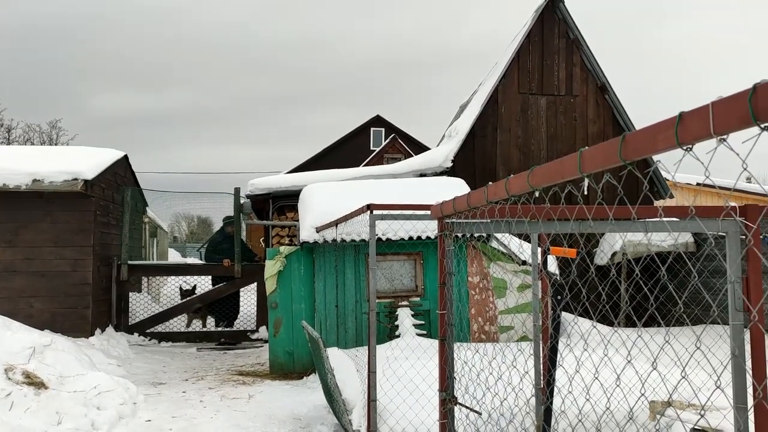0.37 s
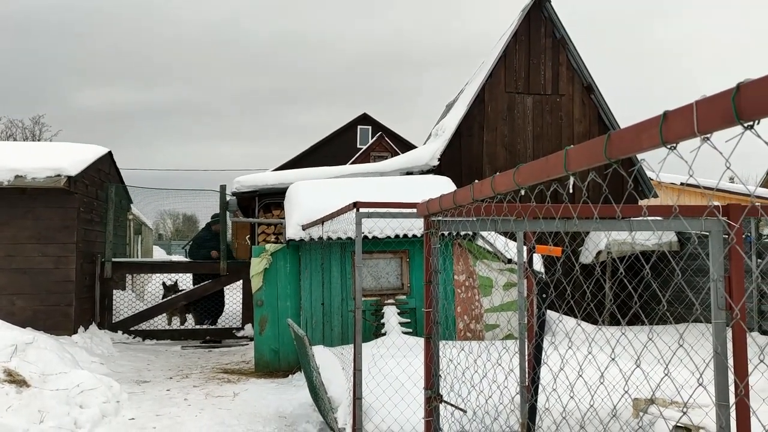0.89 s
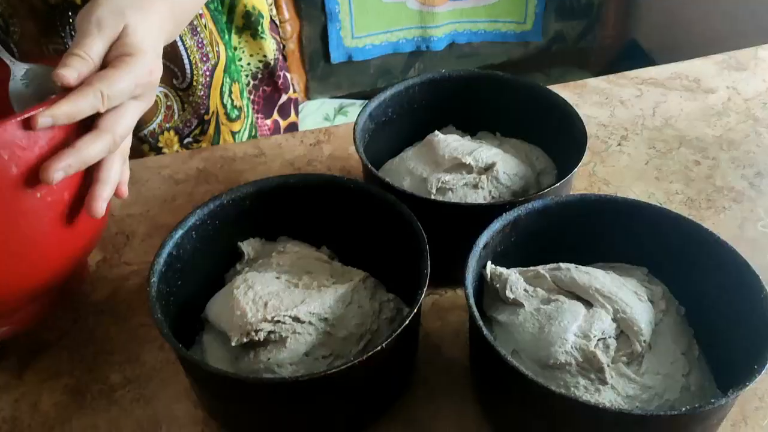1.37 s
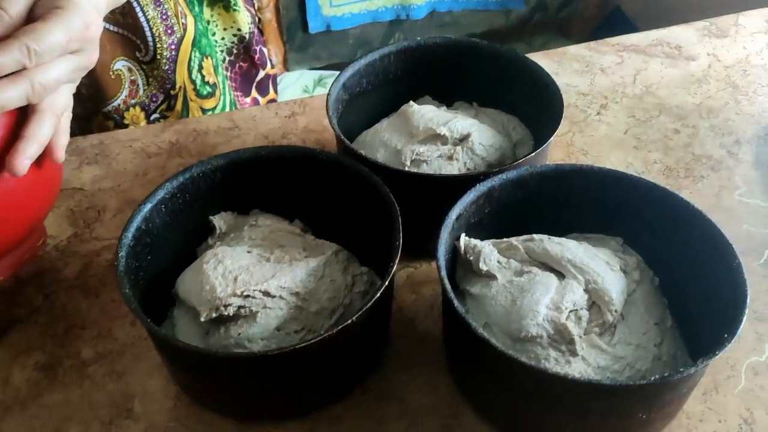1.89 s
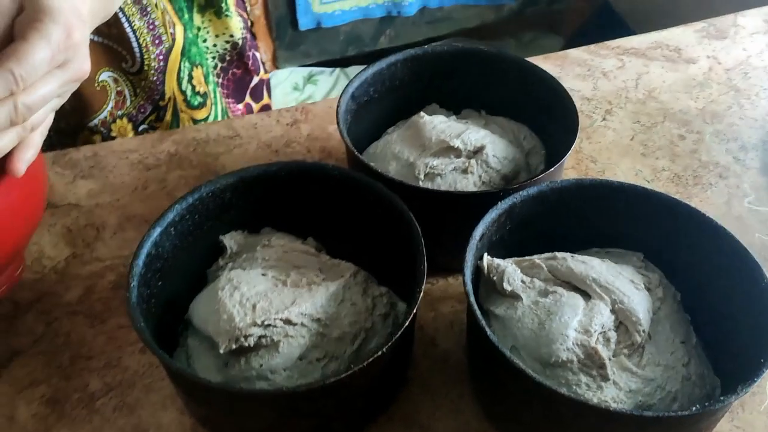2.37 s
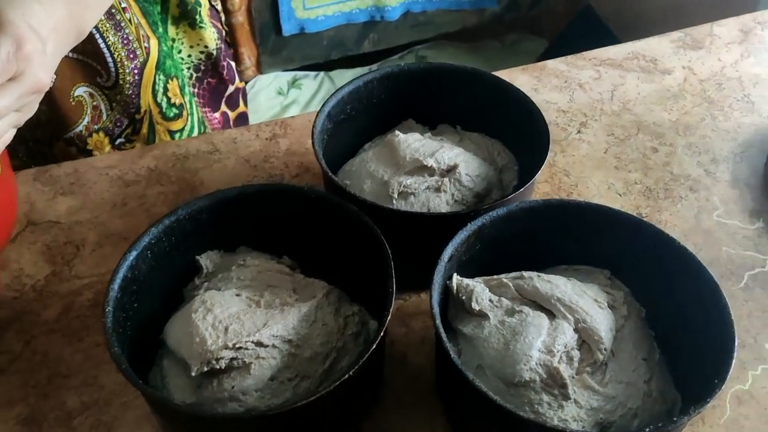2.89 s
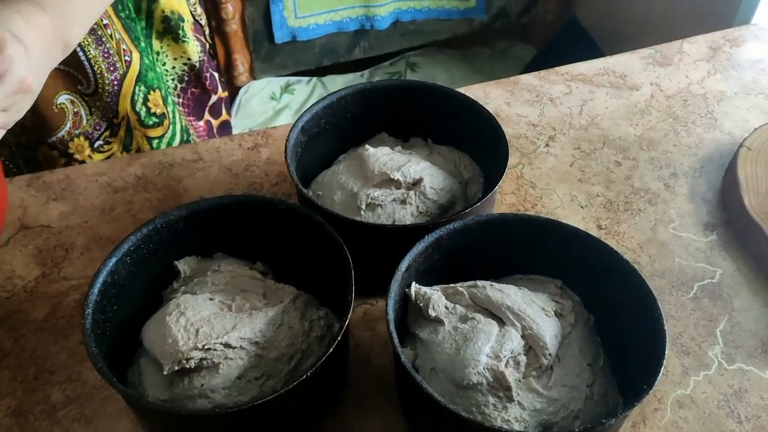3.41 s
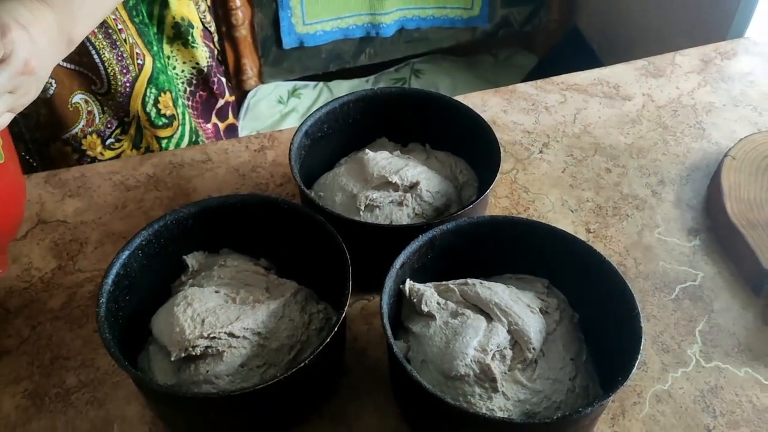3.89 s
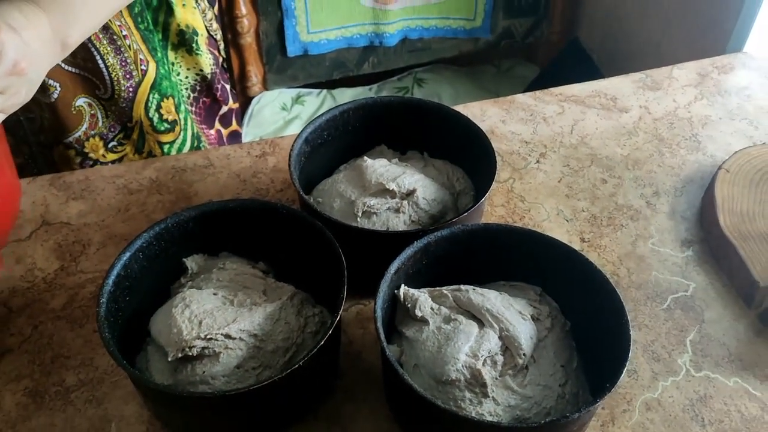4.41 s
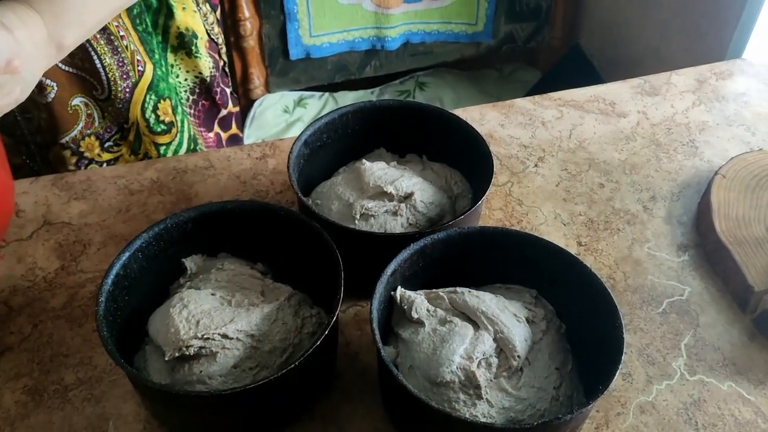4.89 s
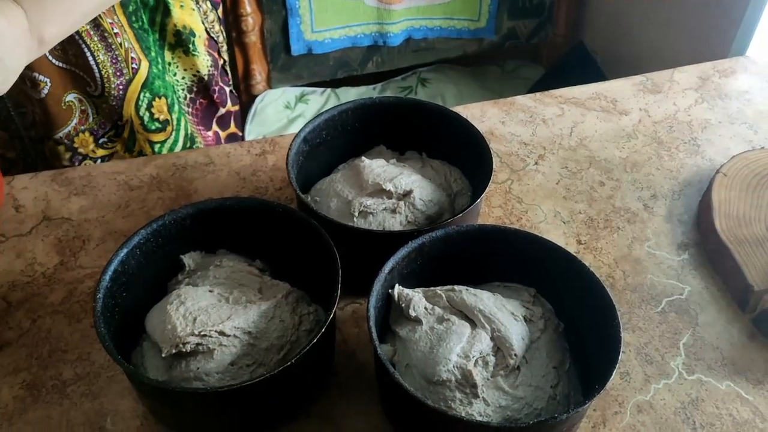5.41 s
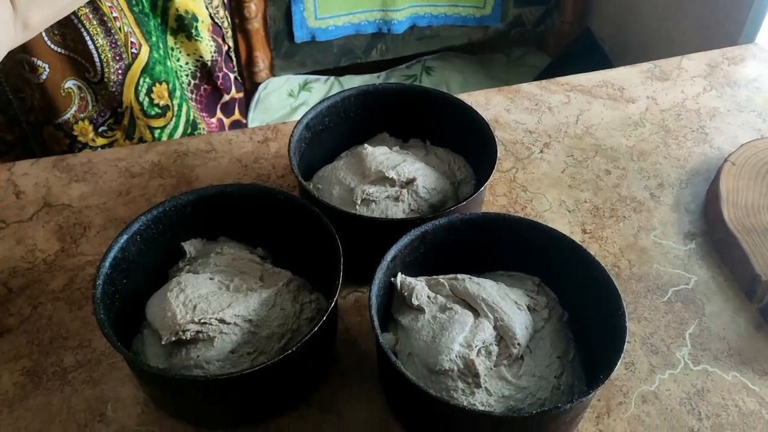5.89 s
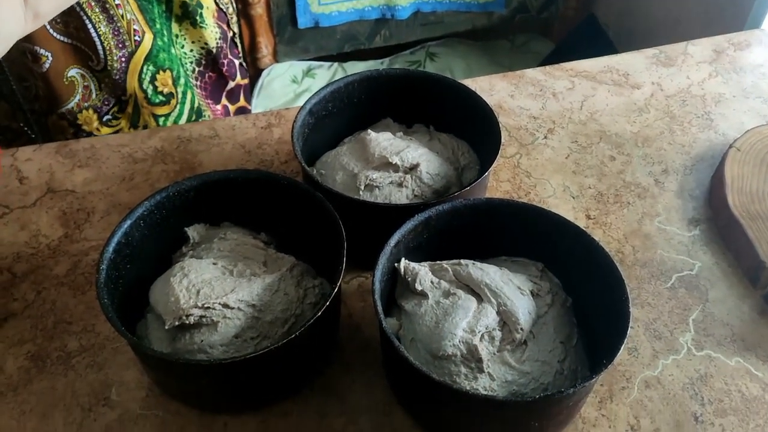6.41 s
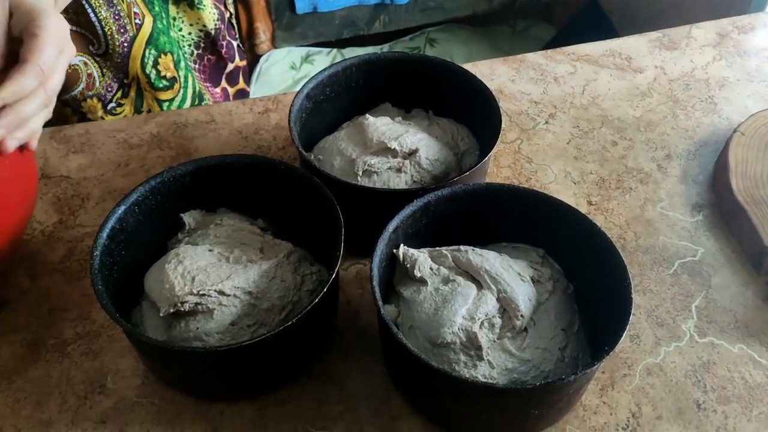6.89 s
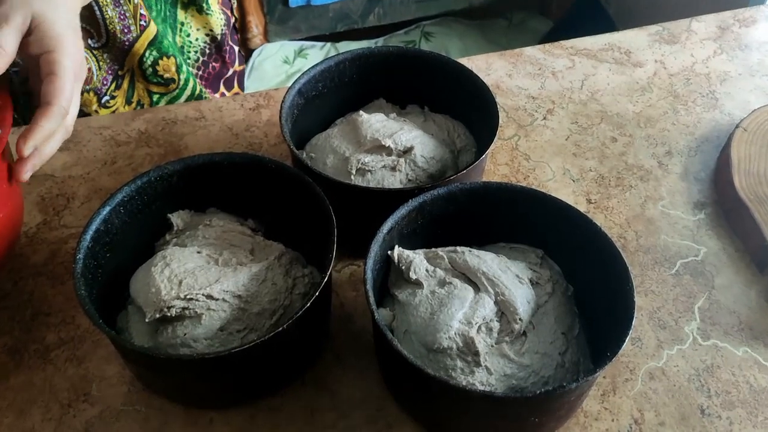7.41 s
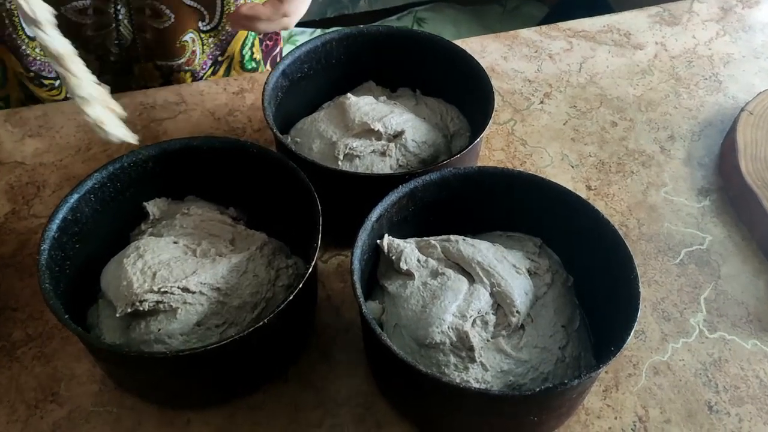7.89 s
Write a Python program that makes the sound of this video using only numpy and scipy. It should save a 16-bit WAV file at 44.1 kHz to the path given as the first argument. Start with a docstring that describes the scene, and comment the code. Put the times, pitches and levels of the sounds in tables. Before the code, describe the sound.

Boots crunch briefly in snow under light wind, then in a kitchen a spoon knocks and scrapes sticky dough from a plastic bowl.

```python
"""A spoon knocks into a plastic bowl on a kitchen table, to the right, and scrapes sticky dough off its wall.
Blows are struck sums of fading sines; scraping sends rough grains through the same bowl, plus rasp and hiss.
The table thumps along, and a small room answers with scattered echoes over quiet air.
Before the kitchen comes about a second of snowy yard, then a short silent cut: shaped noise makes the wind,
and grains of noise make the crunching snow."""
import sys
import numpy as np
from scipy import signal
from scipy.fft import rfft, irfft, next_fast_len
from scipy.io import wavfile
from scipy.ndimage import uniform_filter1d, map_coordinates

SR = 44100
rng = np.random.default_rng(int(sys.argv[2]) if len(sys.argv) > 2 else 0)


def to_wav(sig):
    """Store sig (one row per channel, or 1-D mono) as 16-bit WAV at the path in sys.argv[1].

    Samples outside -1..1 are clipped; the rate is SR.
    """
    pcm = np.clip(np.atleast_2d(sig), -1, 1) * 32767
    pcm = np.round(pcm).astype(np.int16)
    wavfile.write(sys.argv[1], SR, pcm.T)  # frames by channels


def linear_from_db(decibels):
    """Turn decibels (scalar or array-like) into linear amplitude factors; 0 gives 1."""
    return 10 ** (np.asarray(decibels, float) / 20)


N = 354123  # length in samples

# Spoon blows. Each row: start in seconds, level in dB, tone of the struck spot in Hz,
# hardness in dB (more means more treble), table thump in dB (more means more thump).
KNOCKS = [(1.408, -51.5, 350, 0, -34), (1.677, -35.5, 624, 1.5, -64), (1.727, -52.5, 348, 14.5, -39),
          (1.761, -39.5, 322, 0, -49), (2.059, -56, 370, -13, -12), (2.143, -31.5, 420, -8, -42),
          (2.223, -45, 579, 2, -26), (2.631, -39.5, 420, -0.5, -24), (3.091, -51.5, 390, -8.5, -14),
          (3.18, -38.5, 355, -26, -18), (3.519, -38.5, 400, -4, 1), (3.602, -21, 420, -10.5, -23),
          (3.689, -40, 408, -5.5, -30), (3.764, -18.5, 544, -20.5, -55), (3.932, -40.5, 428, -6, 1),
          (4.069, -22, 440, -21, -25), (4.186, -33, 564, -4.5, -50), (4.593, -38, 480, -5.5, -27),
          (5.076, -26.5, 474, -16.5, -43.5), (5.228, -31.5, 580, -3, -38), (5.578, -37, 504, -2.5, -18),
          (6.089, -70, 452, 11.5, -25), (6.231, -21.5, 520, -7, -23), (7.113, -44.5, 595, -10.5, -6.5),
          (7.193, -52.5, 352, -31, -4), (7.28, -58, 554, -0.5, -28), (7.555, -64, 417, -6, -24)]
# Ringing tones of the bowl. Each row: pitch in Hz, level in dB, time to fade by 60 dB in seconds
# when nothing damps it further.
BOWL = [(259.5, -44.5, 0.12), (350, -27, 0.14), (369.2, -4.5, 0.11), (420, -7, 0.26), (442.4, -6, 0.15),
        (456.6, 0, 0.07), (536.6, -1.5, 0.12), (576.5, 2, 0.13), (621, -7, 0.053), (700, 0, 0.043),
        (791, 0, 0.034), (948, -7, 0.042), (1015, -8, 0.027), (1159.4, 4, 0.04), (1317, 1.5, 0.021),
        (1667, 2, 0.066), (1880, -51, 0.1), (1842, 18.5, 0.0096), (2120, -14, 0.047), (2205, -1.5, 0.019),
        (2396, -20.5, 0.043), (2688, -18, 0.087), (2953, 2, 0.019), (3220, -1, 0.22), (3600, -22.5, 0.033),
        (3590, -18, 0.02), (3990, 2, 0.022), (4240, 6, 0.015)]
# Ringing tones of the table. Each row: pitch in Hz, level in dB, time to fade by 60 dB in seconds.
TABLE = [(92.6, 1.5, 0.31), (83.7, -5, 0.23), (56, -10, 0.15)]
# Colour of the shearing dough film, also of the crack of a blow. Each row: frequency in Hz, level in dB.
RASP = [(400, -13), (800, -12), (1200, -14), (1700, -3.5), (2400, -3.5), (3200, -5.5), (4000, -13.5),
        (5000, -21.5), (7000, -39), (14000, -66)]
BODY_TOP_HZ = 860  # tones below belong to the whole bowl, tones above to the wall at the spoon


def knocks():
    """Each blow rings the bowl most near the tone of its spot, with treble, a noisy crack and a table thump."""
    out, hz = np.zeros(N + SR), np.transpose(BOWL)[0][:, None]
    t = np.arange(SR // 3) / SR
    chances = rng.standard_normal((len(KNOCKS), len(BOWL), 1))  # no two blows ring the tones alike
    cracks = rng.standard_normal((len(KNOCKS), len(t)))
    push = signal.windows.hann(30)  # the soft contact lasts under a millisecond
    for (s, db, spot_hz, hard_db, thump_db), chance, crack in zip(KNOCKS, chances, cracks):
        near = 0.084 + 1 / (1 + (np.log(hz / spot_hz) / 0.1) ** 2)
        body = ring(BOWL, near * (hz < BODY_TOP_HZ) * linear_from_db(2.8 * chance))
        body = radiated(np.convolve(body, push)[:len(t)])
        # a quick build-up, and a stronger start that the spoon damps
        body = body * (1 + 0.23 * linear_from_db(-60 * t / 0.11)) * (1 - np.exp(-t / 0.00022))
        treble = ring(BOWL, (hz >= BODY_TOP_HZ) * chance * (1200 / hz) ** 1.6, 1.4)
        crack = evened(coloured(crack, RASP)) * linear_from_db(-60 * t / 0.031) * (1 - np.exp(-t / 0.0001))
        treble = treble / abs(treble).max() + 0.42 * crack
        thump = ring(TABLE) * (1 - np.exp(-t / 0.012))  # the heavy top takes time to swing
        blow = body / abs(body).max() + linear_from_db(hard_db + 5.5) * treble + linear_from_db(thump_db - 10.0) * thump
        out[round(s * SR):][:len(t)] += linear_from_db(db + 0.5) * blow
    return out[:N]


# Spoon strokes along the wall. Each row: start in seconds, rise in seconds, hold in seconds,
# scrape level in dB, weight on the spoon in dB (more means more bowl in the scrape).
STROKES = [(1.308, 0.11, 0.011, -61, 5), (1.679, 0.077, 0.0075, -49.5, 2.5), (2.064, 0.1, 0.0078, -77, 10),
           (2.122, 0.047, 0.18, -60.5, 1.5), (2.412, 0.049, 0.035, -69, 1), (2.64, 0.078, 0.11, -56.5, -3),
           (2.948, 0.046, .001, -70, -1), (3.111, 0.064, .13, -50.5, -3.5),
           (3.645, 0.075, .005, -41.5, -30), (4.108, 0.095, 0.0072, -45, 2),
           (4.536, 0.079, 0.098, -55.5, 5), (4.718, 0.051, 0.0024, -43.5, 4.5),
           (5.076, 0.19, 0.0036, -47.5, 7.5), (5.375, 0.07, 0.01, -61.5, -19.5),
           (5.572, 0.1, .29, -54.5, -7.5), (6.057, 0.13, 0.0041, -60.5, -11),
           (6.286, 0.019, 0.048, -51, -16), (6.362, 0.046, 0.27, -56.5, -1.5),
           (6.756, 0.046, 0.025, -62, -6.5), (6.897, 0.15, 0.036, -56.5, -17.5),
           (7.123, 0.023, 0.024, -73, -15), (7.373, 0.012, 0.02, -70.5, -4)]
TOUCH_DB, LIFT_DB_PER_S = -16.5, 281.5  # a stroke starts this far under its peak; it fades as the spoon lifts
TRAIL_DB, TRAIL_DB_PER_S = -17.5, 100  # dough threads go on peeling after the lift
LOAD_DB, LOAD_S = 2.5, 0.26  # the spoon gathers dough after the rise and presses harder
SKID_DB, SKID_SHARE = -31.5, 0.84  # after a blow the spoon skids, louder for a louder blow
SKID_WEIGHT_DB, SKID_DB_PER_S = 9, 262


def contact():
    """Level of the scraping, weight on the spoon and its speed 0-1, summed in power over strokes and skids."""
    t = np.arange(0, N + 64, 64) / SR  # one point every 64 samples
    start, rise, hold, db, weight_db = np.transpose(STROKES)[:, :, None]
    after = np.maximum(t - start - rise - hold, 0)
    lift = linear_from_db(-LIFT_DB_PER_S * after) ** 2
    trail = (after > 0) * linear_from_db(TRAIL_DB - TRAIL_DB_PER_S * after) ** 2
    swell_db = db + TOUCH_DB * np.maximum(1 - (t - start) / rise, 0)
    strokes = (t >= start) * linear_from_db(swell_db) ** 2 * (lift + trail)
    load_db = LOAD_DB * np.clip((t - start - rise) / LOAD_S, 0, 1)
    loaded = strokes * linear_from_db(weight_db + load_db) ** 2
    s, blow_db = np.transpose(KNOCKS)[:2, :, None]
    skid_db = SKID_DB + SKID_SHARE * blow_db - SKID_DB_PER_S * abs(t - s)
    skids = ((t >= s) * linear_from_db(skid_db) ** 2).sum(0)
    power = strokes.sum(0) + skids + 1e-20
    heavy = loaded.sum(0) + skids * linear_from_db(SKID_WEIGHT_DB) ** 2 + 1e-20
    speed = (strokes * np.clip((t - start) / (rise + hold), 0, 1)).sum(0) / power
    return [curve(np.c_[t, v]) for v in (np.sqrt(power), 10 * np.log10(heavy / power), speed)]


# Colour of the thin tearing film. Each row: frequency in Hz, level in dB.
HISS = [(3000, -7.5), (4500, -0.5), (6500, -15.5), (9000, -22), (14300, -30.5)]
# How strong the hiss is. Each row: time in seconds, hiss over scrape in dB.
HISS_LEVEL = [(1.3, -15), (1.9, -6.5), (2.3, -5), (2.9, -7.5), (3.2, -16), (3.8, -18.5), (4.3, -15),
              (5.1, -17), (5.3, -16), (5.8, -19), (6.8, -20.5), (7.1, -15), (8.1, -16.5)]
WALL_TOP_HZ = 1450  # tones above ring only in the patch under the edge
SLOW_COLOUR, FAST_COLOUR = 0.89, 1.053  # pitch factors: the rasp slides up as a stroke gathers speed


def scraping():
    """Stick-slip grains at the spoon edge drive the bowl at a wandering spot; the dough film rasps and hisses."""
    level, weight_db, speed = contact()
    hz = np.transpose(BOWL)[0][:, None]
    whole, patch = hz < BODY_TOP_HZ, hz >= WALL_TOP_HZ
    broad = ~whole & ~patch
    stutter_db = 2.45 * evened(uniform_filter1d(rng.standard_normal(N), 500))  # the edge catches unevenly
    press = level * linear_from_db(stutter_db)
    slips = evened(grains(900, 2.73, 0.66))
    bowl = np.zeros(N)
    for share, chance in zip(wandering(count=4, per_s=7), rng.standard_normal((4, len(BOWL), 1))):
        mix = np.sign(chance) * linear_from_db(1.7 * chance)  # each spot excites its own mix of tones
        low = ring(BOWL, mix * whole, 1.48)
        middle = ring(BOWL, mix * broad, 2.3)
        high = ring(BOWL, mix * patch, 2.5)
        drive = share * slips * press
        # broad wall bending follows the weight half way
        bowl += signal.oaconvolve(drive * linear_from_db(0.5 * weight_db - 8.0), middle / np.linalg.norm(middle))[:N]
        bowl += signal.oaconvolve(drive * linear_from_db(weight_db), low / np.linalg.norm(low))[:N]
        bowl += linear_from_db(-14.0) * signal.oaconvolve(drive, high / np.linalg.norm(high))[:N]
    slow = evened(coloured(slips, np.multiply(RASP, (SLOW_COLOUR, 1))))
    fast = evened(coloured(slips, np.multiply(RASP, (FAST_COLOUR, 1))))
    rasp = linear_from_db(0.5) * (slow + speed * (fast - slow))
    hiss = linear_from_db(curve(HISS_LEVEL)) * evened(coloured(grains(2500, 1.7, 0.8), HISS))
    drag = signal.oaconvolve(slips * press * linear_from_db(weight_db), ring(TABLE))[:N]  # the table shakes along
    return radiated(bowl + press * (rasp + hiss)) + linear_from_db(-62.0) * drag


def radiated(x):
    """A small bowl is too small to send out deep bass, so the sound is thinned below 294 Hz."""
    return signal.sosfilt(signal.butter(4, 294, "high", fs=SR, output="sos"), x)


def tick():
    """One dry tick, as of a dough thread snapping: a tiny burst of one tone."""
    return pop(3.0122, -30.5, 980, 0.24)


# How fast the room dies away. Each row: frequency in Hz, time to fade by 60 dB in seconds.
ROOM = [(100, 0.37), (500, 0.2), (2000, 0.17), (8000, 0.19)]
# Colour of the sound fed to the echoes. Each row: frequency in Hz, level in dB.
WET = [(100, -14), (400, -14), (1000, 5), (3000, -0.5), (10000, 7)]


def room(x):
    """Sparse taps of random sign, each band dying at its own speed; echoes change as hands and bowl move."""
    taps = np.zeros((5, 2, SR // 2))
    at = np.arange(60, SR // 2 - 20, 20)
    at = at + rng.integers(0, 20, (5, 2, len(at)))
    np.put_along_axis(taps, at, rng.choice([-1., 1.], at.shape), 2)
    hz, t, bands = signal.stft(taps, SR, nperseg=256)
    t60 = np.maximum(read(ROOM, hz), 0.05)[:, None]
    tails = signal.istft(bands * linear_from_db(-60 * t / t60), SR, nperseg=256)[1]
    fed = wandering(count=5, per_s=9)[:, None] * coloured(x, WET)
    return signal.fftconvolve(fed, tails / np.linalg.norm(tails[0, 0]), axes=2)[..., :N].sum(0)


# Difference between the sides. Each row: frequency in Hz, left over right in dB.
SHADE = [(60, 0), (240, 0.5), (930, 1.5), (3640, -2), (14300, 3)]
# Colour of the still kitchen air. Each row: frequency in Hz, level in dB.
AIR = [(12, -61), (20, 0), (91, -2.5), (149, -10.5), (412, -1), (557, -5.5), (1020, -7.5), (1110, -4.5),
       (1420, -7.5), (2980, -8), (6810, -21), (12800, -21), (14300, -26)]
AIR_DB = -68.5


def kitchen():
    """The bowl is to the right: its sound reaches the left side later, by a lag that wanders."""
    bowl = knocks() + scraping()
    near = bowl + tick()  # the tick gets no echo
    lag = 15 + 8 * (wandering(count=2, per_s=12)[0] ** 2 - 0.5)  # in samples
    late = map_coordinates(near, [np.arange(N) - lag], order=3)
    direct = np.array([coloured(late, SHADE, 0.5), coloured(near, SHADE, -0.5)])
    return linear_from_db(3.0) * direct + room(bowl) + air(AIR, AIR_DB)


# Boots in snow. Each row: deepest moment in seconds, crush level in dB,
# sinking time in seconds, settling time in seconds (both to 20 dB down).
STEPS = [(0.237, -56.5, 0.054, 0.13), (0.608, -54, 0.11, 0.14), (0.75, -58.5, 0.043, 0.12)]
# Colour of the crushed snow. Each row: frequency in Hz, level in dB.
CRUSH = [(180, -52), (300, -41), (587, -1.5), (1340, -6.5), (2830, -6), (3630, -22), (4000, -19),
         (5200, -37), (8800, -120)]
# Colour of the hard crust, for crackle and snaps. Each row: frequency in Hz, level in dB.
CRUST = [(2060, -29), (3500, -6), (3600, -27), (3760, -5), (5840, 5), (7180, -8.5), (11200, -10.5),
         (14300, -23)]
SNOW_REST_DB, CRACKLE_DB = -80.5, -6  # the snow keeps creaking between steps; crackle over crush


def footsteps():
    """Snow crushed in dense grains under a crackling crust, swelling and settling with each step."""
    s, db, sinking, settling = np.transpose(STEPS)[:, :, None]
    late = np.arange(N) / SR - s
    tread = linear_from_db(SNOW_REST_DB) + linear_from_db(db - 20 * np.maximum(-late / sinking, late / settling)).sum(0)
    crush = shared(grains(1600, 6.2, 0.18), grains(1300, 6.3, 0.97), 0.043)
    crackle = shared(grains(840, 15, 0.15), grains(700, 5.6, 1.0), 0.055)
    return tread * (evened(coloured(crush, CRUSH)) + linear_from_db(CRACKLE_DB) * evened(coloured(crackle, CRUST)))


# Crust snaps. Each row: start in seconds, level in dB.
CRACKS = [(0.1, -59), (0.205, -53), (0.2422, -36), (0.4678, -54.5), (0.552, -49), (0.593, -65),
          (0.628, -40), (0.643, -41), (0.6553, -41), (0.7218, -48), (0.7452, -41.5), (0.7538, -38),
          (1.089, -56)]


def crust_snaps():
    """Each snap of the crust is a few milliseconds of quickly fading noise."""
    snaps, t = np.zeros((2, N)), np.arange(400) / SR
    for (s, db), noise in zip(CRACKS, rng.standard_normal((len(CRACKS), 2, 400))):
        snaps[:, round(s * SR):][:, :400] += linear_from_db(db - 6.0 - 60 * t / 0.026) * evened(coloured(noise, CRUST))
    return snaps


def thud():
    """Packed snow gives way under a boot: a short smooth burst of one tone."""
    return pop(0.602, -46, 605, 5.2)


# Colour of the wind. Each row: frequency in Hz, level in dB.
WIND = [(12, -27), (20, 8), (201, -9.5), (336, -19), (380, -34), (400, -17), (520, -63), (880, -120)]
# Strength of the wind on the microphone. Each row: time in seconds, level in dB.
GUSTS = [(0.0, -55), (0.02, -51), (0.038, -70), (0.328, -46), (0.382, -73), (0.41, -56), (0.476, -71),
         (0.606, -53.5), (0.656, -71), (0.74, -73), (0.792, -72), (0.974, -81), (1.002, -59),
         (1.168, -75.5), (1.26, -68)]


def gusts():
    """Lumpy wind on the microphone: low noise, separate for each side, rising and falling."""
    return evened(coloured(rng.standard_normal((2, N)), WIND)) * linear_from_db(curve(GUSTS))


# Colour of the still yard air. Each row: frequency in Hz, level in dB.
YARD_AIR = [(12, -34), (20, -28), (331, -4.5), (379, -6), (605, -4.5), (1340, -11.5), (1630, -12),
            (12500, -26), (14300, -27)]
YARD_AIR_DB = -69.5


def yard():
    """Steps, snaps and a thud in the snow, with wind and steady air behind."""
    return footsteps() + crust_snaps() + thud() + gusts() + air(YARD_AIR, YARD_AIR_DB)


# How alike the air sounds on both sides. Each row: frequency in Hz, likeness from 0 to 1.
SAME = [(30, 0.64), (100, .7), (400, 0.73), (1200, 0.017), (14000, 0)]


def air(points, db):
    """Steady background noise of a place, partly alike on both sides in the bass."""
    a, b = rng.standard_normal((2, N))
    same = np.clip(read(SAME, np.fft.rfftfreq(N, 1 / SR)), 0, 1)
    b = irfft(same * rfft(a) + np.sqrt(1 - same ** 2) * rfft(b), N)
    return linear_from_db(db) * evened(coloured(np.array([a, b]), points))


def ring(modes, weight=1, damping=1):
    """Ringing of a struck body: a sum of fading sines; more damping fades them sooner."""
    hz, db, t60 = np.transpose(modes)[:, :, None]
    t = np.arange(SR // 3) / SR
    return (weight * linear_from_db(db - 60 * damping * t / t60) * np.sin(2 * np.pi * hz * t)).sum(0)


def grains(per_s, spread_db, smooth):
    """Sparse clicks of uneven size over a smooth bed of noise."""
    size_db = spread_db * np.minimum(rng.exponential(1, N), 4)
    clicks = (rng.random(N) < per_s / SR) * linear_from_db(size_db) * rng.choice([-1, 1], N)
    return evened(clicks) + smooth * rng.standard_normal(N)


def pop(s, db, hz, cycles):
    """A short smooth burst of one tone."""
    t = np.arange(N) / SR - s
    return linear_from_db(db) * np.sin(2 * np.pi * hz * t) * np.exp(-(t * hz / cycles) ** 2)


def shared(left, right, alike):
    """Two sides, each with a little of the other."""
    return np.array([left + alike * right, right + alike * left])


def wandering(count, per_s):
    """Windows that hand over to each other at random; their squares sum to one."""
    coarse = rng.standard_normal((count, int(N / SR * per_s) + 2)) ** 2 + 1e-6
    shares = np.array([np.interp(np.arange(N) * per_s / SR, np.arange(len(c)), c) for c in coarse])
    return np.sqrt(shares / shares.sum(0))


def curve(rows):
    """A curve of (seconds, value) rows, read at every sample."""
    return np.interp(np.arange(N) / SR, *np.transpose(rows))


def evened(x):
    """Scales to an rms of one."""
    return x / np.sqrt(np.mean(x ** 2) + 1e-20)


def read(points, hz):
    """A table over frequency, read at the given frequencies."""
    f, value = np.transpose(points)
    return np.interp(np.log(hz + 1), np.log(f + 1), value)


def coloured(x, points, share=1):
    """Filters by a colour table; share scales its dB."""
    n = x.shape[-1]
    size = next_fast_len(n)
    gain = linear_from_db(share * read(points, np.fft.rfftfreq(size, 1 / SR)))
    return irfft(rfft(x, size) * gain, size)[..., :n]


def scene():
    """The yard fades out, a short silence follows, the kitchen fades in."""
    t = np.arange(N) / SR
    cut_s, kitchen_s, fade_s = 1.268, 1.309, 0.00079
    yard_fade = np.clip((cut_s - t) / fade_s, 0, 1)
    kitchen_fade = np.clip((t - kitchen_s) / fade_s, 0, 1)
    return kitchen() * kitchen_fade + yard() * yard_fade


def top_cut(x):
    """Nothing passes above the cut-off."""
    return signal.sosfilt(signal.butter(12, 14890, fs=SR, output="sos"), x)


def record(dry):
    """Removes the treble above 14300 Hz and finishes the mix."""
    low_pass = signal.firwin(511, 14300, window=("kaiser", 9), fs=SR)
    limited = signal.oaconvolve(dry, low_pass[None], "same")
    return top_cut(limited)


dry = scene()
out = record(dry)
to_wav(out)
```